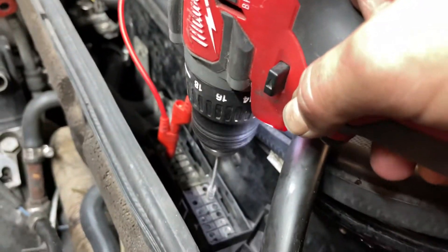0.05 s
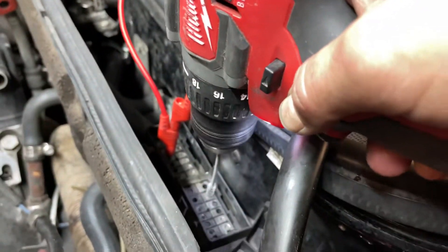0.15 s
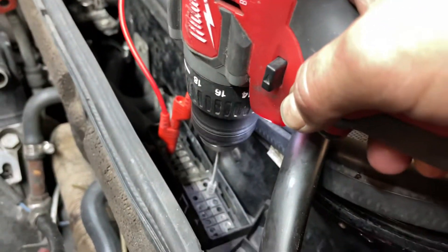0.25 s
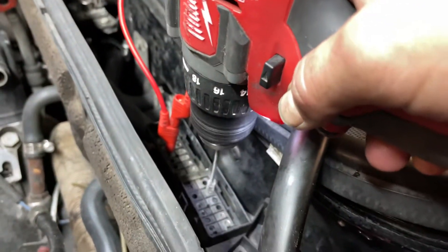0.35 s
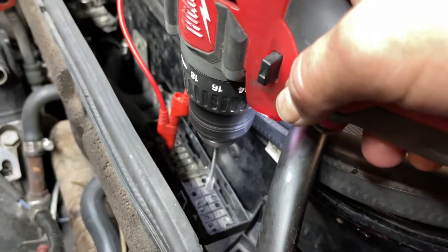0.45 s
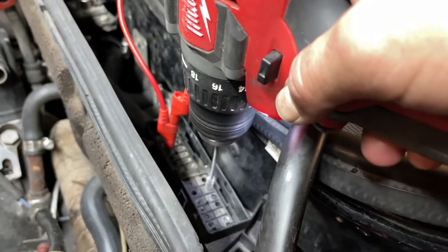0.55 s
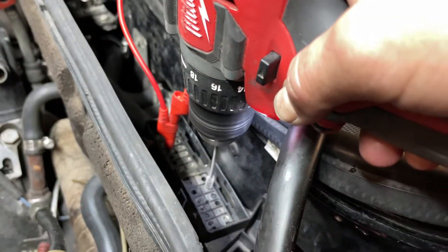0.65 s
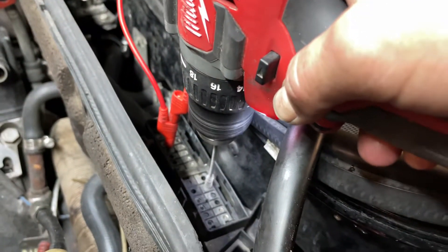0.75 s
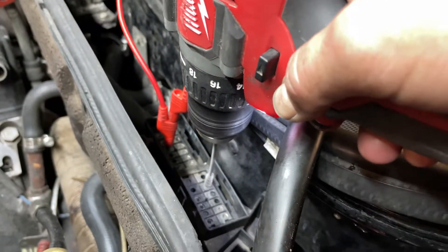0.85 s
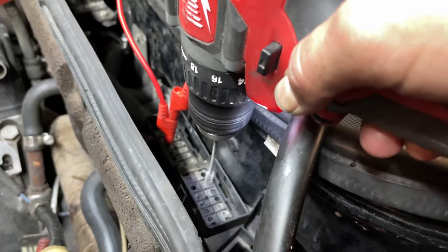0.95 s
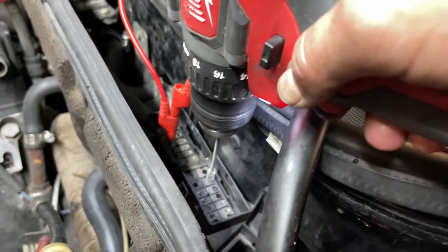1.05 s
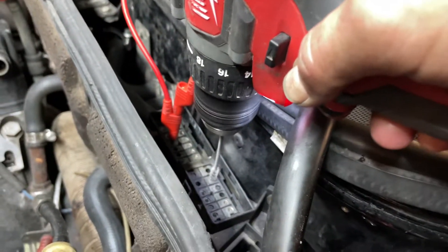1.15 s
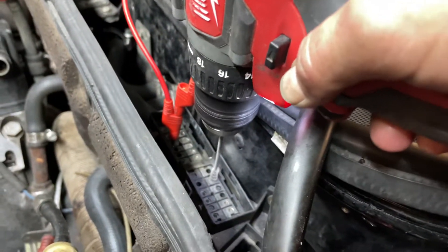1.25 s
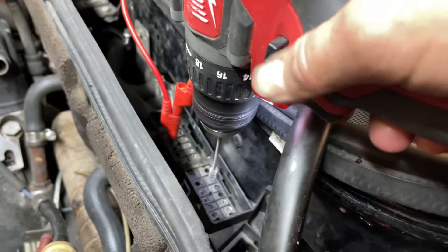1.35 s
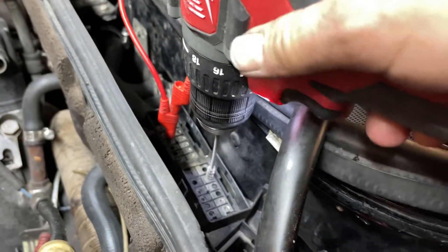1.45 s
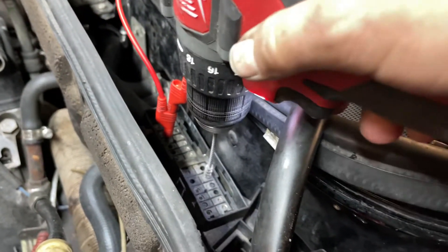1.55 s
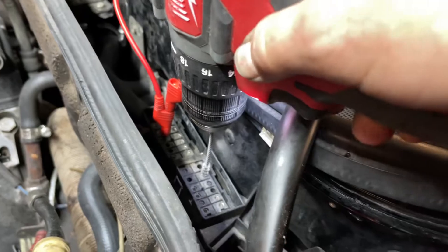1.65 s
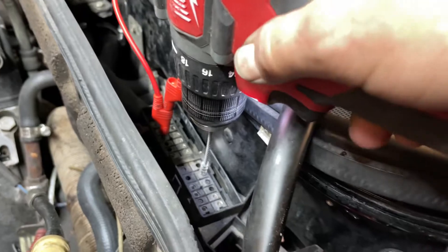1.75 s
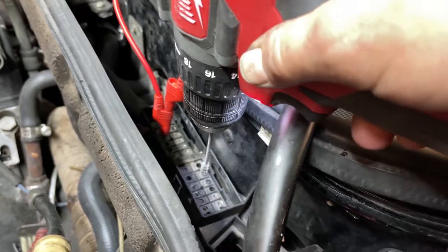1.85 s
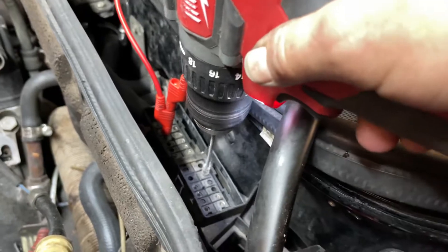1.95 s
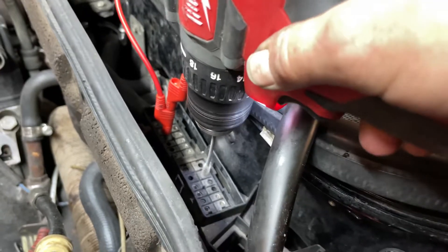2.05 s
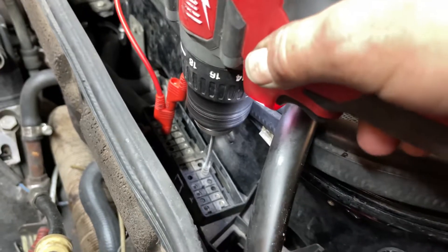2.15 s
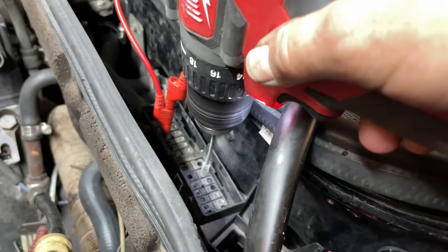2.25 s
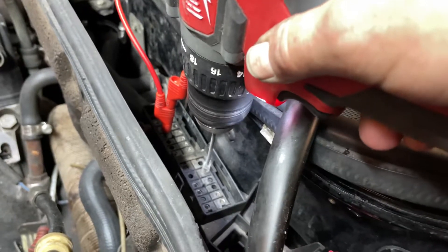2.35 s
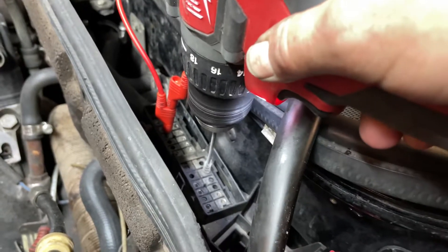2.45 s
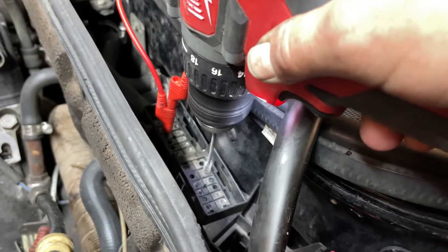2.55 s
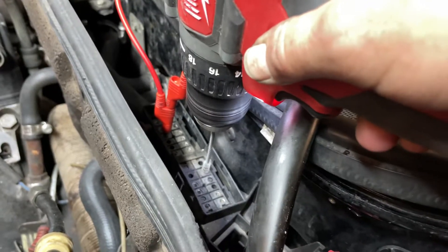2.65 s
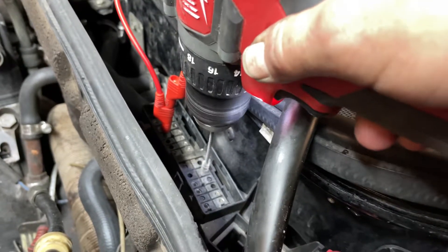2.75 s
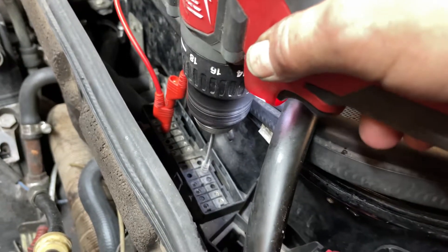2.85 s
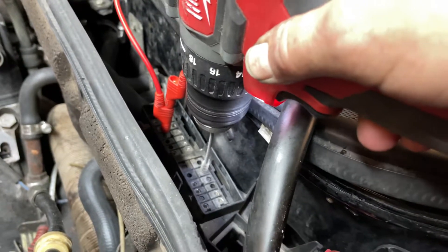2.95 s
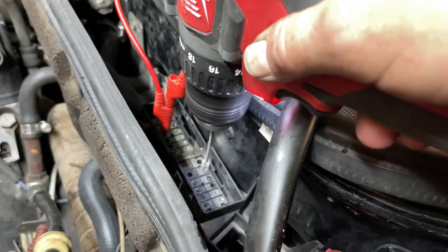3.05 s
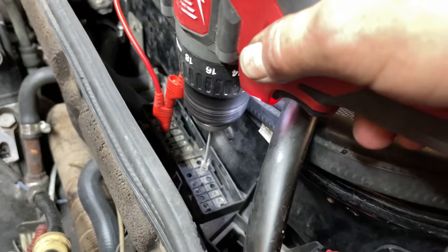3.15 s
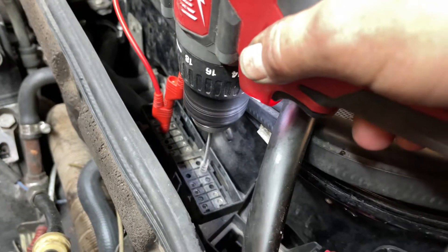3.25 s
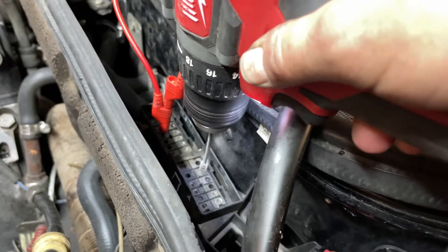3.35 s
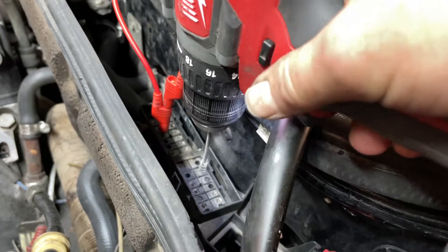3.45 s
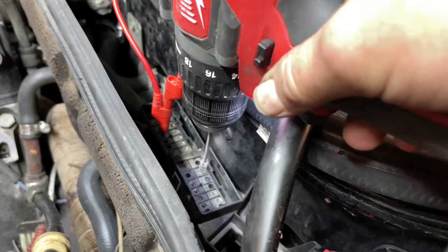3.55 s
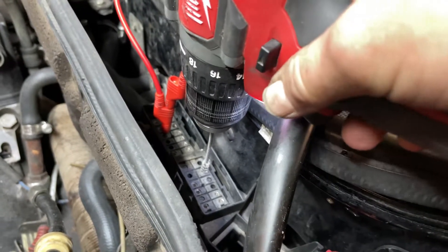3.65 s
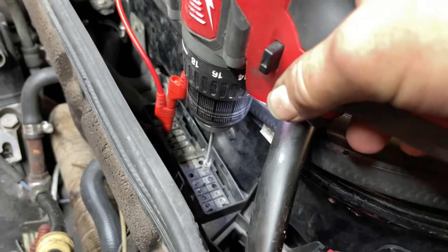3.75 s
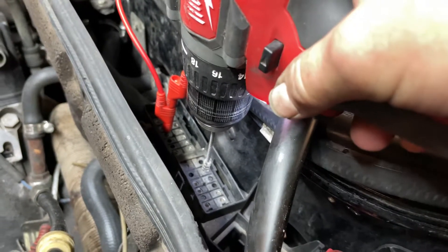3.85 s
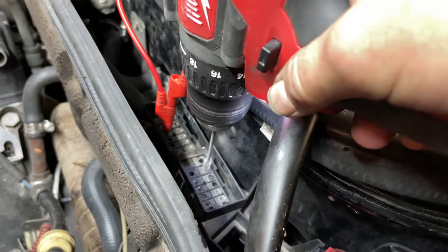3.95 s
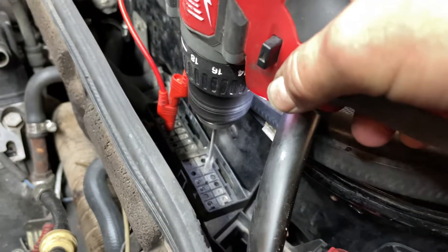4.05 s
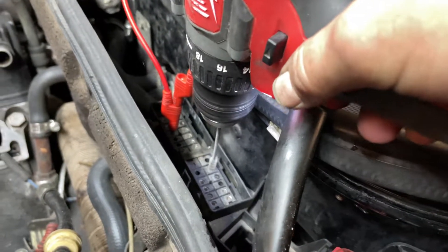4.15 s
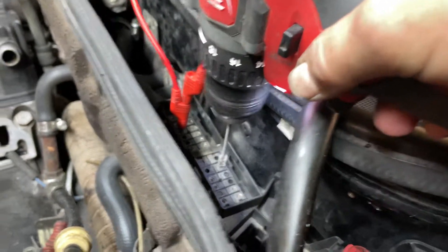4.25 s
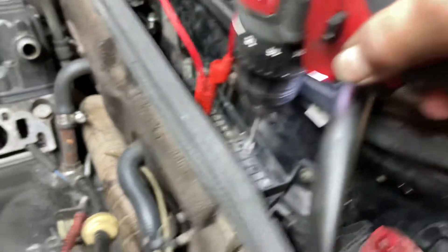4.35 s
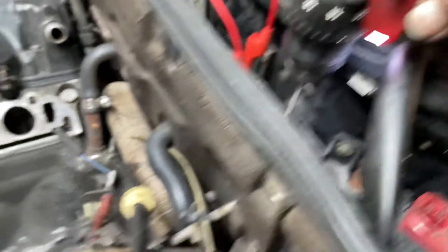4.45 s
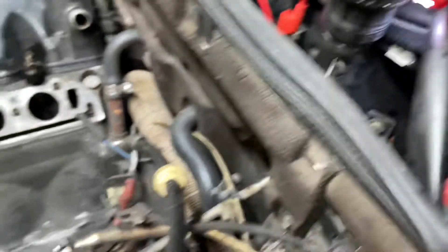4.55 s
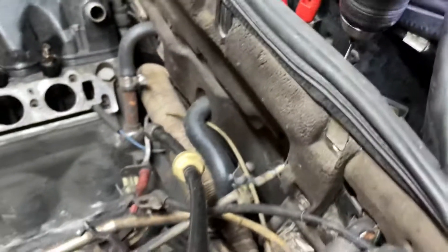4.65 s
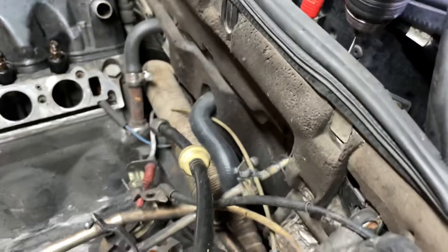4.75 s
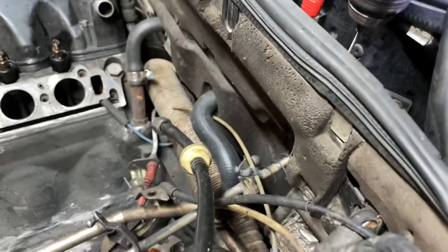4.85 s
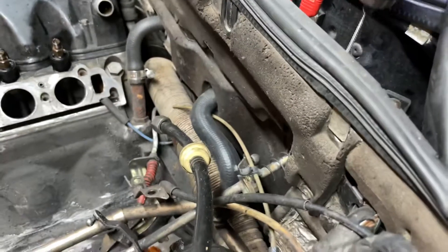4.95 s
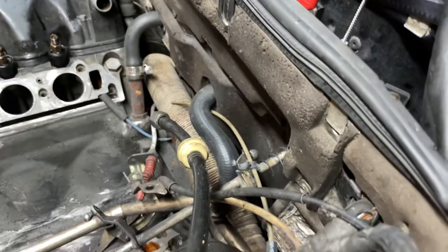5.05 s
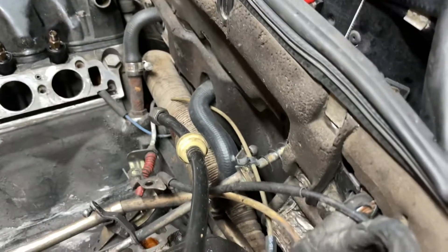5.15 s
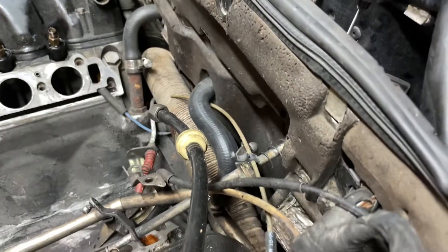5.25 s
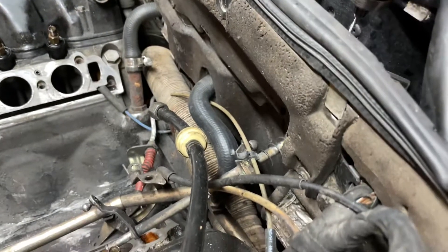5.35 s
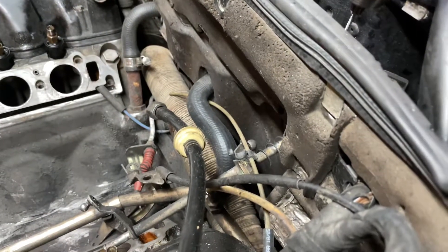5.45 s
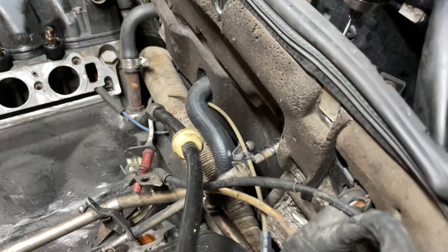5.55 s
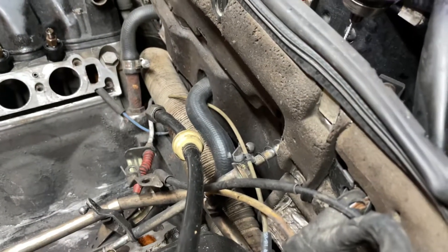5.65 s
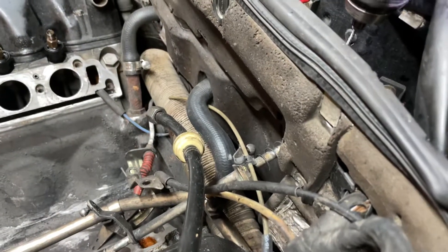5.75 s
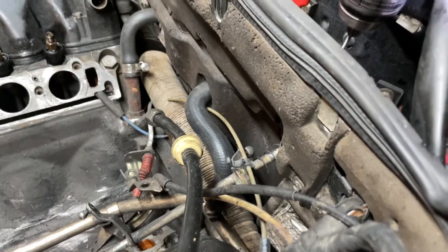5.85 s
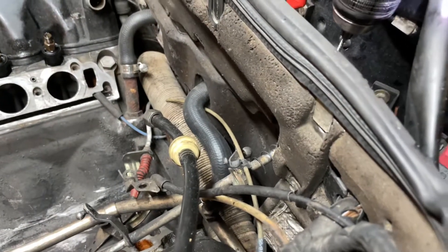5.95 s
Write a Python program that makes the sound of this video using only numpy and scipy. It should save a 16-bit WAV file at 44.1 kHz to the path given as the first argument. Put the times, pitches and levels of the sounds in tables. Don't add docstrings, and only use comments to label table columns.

```python
import sys
import numpy as np
from scipy import signal
from scipy.fft import rfft, irfft, next_fast_len
from scipy.io import wavfile
from scipy.ndimage import uniform_filter1d

SR = 44100
rng = np.random.default_rng(int(sys.argv[2]) if len(sys.argv) > 2 else 0)


def elevation(decibels):
    levels = np.asarray(decibels, float)
    return 10 ** (levels / 20)


def store_wav(level_fs):
    pcm = np.round(np.clip(np.atleast_2d(level_fs), -1, 1) * 32767)
    wavfile.write(sys.argv[1], SR, pcm.T.astype(np.int16))


N = 264776
TIME = np.arange(N) / SR
SIZE = next_fast_len(N + SR)
HZ = np.maximum(np.arange(SIZE // 2 + 1) * SR / SIZE, 1)

# (time [s], rotor speed [rev/s], rattle level [dB])
BURST_POINTS = [
    [(0.05, 116, -22.5), (0.145, 145, -22.5), (0.21, 308, -16), (0.285, 337.5, -16.5),
     (0.855, 339.5, -20.5), (1.0, 291, -24.5), (1.22, 230, -26.5), (1.29, 192, -28.5), (1.345, 169, -30.5)],
    [(1.91, 307, -23.5), (2.0, 335, -22.5), (2.16, 275, -25), (2.3, 242, -25.5), (2.42, 237, -26.5),
     (2.71, 249, -26), (2.86, 243, -26.5), (3.2, 254.5, -26), (3.3, 228, -27.5)],
    [(3.88, 307, -21), (3.93, 334, -19), (4.0, 351.5, -19.5), (4.095, 340, -19), (4.15, 320, -20.5),
     (4.175, 270, -16.5), (4.2, 200, -27)],
    [(4.56, 286, -23), (4.6, 398, -17.5), (4.65, 437, -16), (4.74, 451, -16), (4.79, 450, -21),
     (4.89, 377, -24), (4.92, 318, -21.5), (4.945, 254, -21)],
]
# (trigger pressed [s], trigger released [s], backwards share [0-1], controller nearness [dB])
TRIGGER_PULLS = [
    (-.1, 1.319, 0, 0.1),
    (1.845, 3.275, 0.99, -0.3),
    (3.81, 4.16, 0.0072, -2.5),
    (4.495, 4.858, 0.0097, -7),
]
TONE_ORDERS = [(0, 1), (0, 2), (0, 3), (0, 4), (0, 5), (0, 7.76), (0, 8), (0, 8.34), (0, 9.34), (0, 12),
               (0, 13), (0, 15.12), (0, 16.12), (0, 17.12), (1, -4), (1, 0), (1, 4), (2, -4), (2, -3),
               (2, -2)]
# (forwards [dB], backwards [dB], slope [dB/octave of speed])
TONE_LEVELS = [(-51.5, -47, 22), (-55.5, -56, 1.5), (-53.5, -60, 7), (-49, -57, 2), (-53.5, -56, 9.5),
               (-53.5, -54.5, -3), (-50, -51, 22), (-45, -48.5, -9), (-45.5, -58, -4), (-48.5, -47, -16),
               (-50.5, -50, 5), (-58, -57.5, 1), (-49.5, -48.5, -15), (-53, -56.5, 0), (-45, -33, 0.5),
               (-51, -45.5, 0), (-36.5, -38, 0.5), (-34, -44, -8), (-58, -57.5, 2), (-58.5, -57, 0.5)]
# (centre [Hz], width [Hz], gain [dB])
CASING_MODES = [(663, 70, 8.5), (1022, 90, 9), (2130, 240, 11), (2608, 160, 9), (2935, 210, 15),
                (3167, 68, 16.5), (3525, 260, 18), (3990, 120, 7.5), (4557, 430, 8.5), (5430, 170, 16),
                (5851, 200, 9.5)]
# (frequency [Hz], density [dB/Hz])
HOUSING_COLOUR = [(150, -7), (300, -9), (600, -2), (900, -1.5), (1250, 5), (1700, 2), (2500, 7.5),
                  (3300, 4.5), (4300, -1.5), (5800, 1.5), (7500, -7), (10000, -14), (13000, -19),
                  (15500, -18)]
# (frequency [Hz], likeness [0-1])
RATTLE_LIKENESS = [(100, 1), (300, 0.8), (700, 0.41), (1200, 0.71), (2000, 0.81), (3000, 0.093),
                   (4000, 0.26), (5500, 0.1), (7000, 0.73), (9000, 0.99), (14000, 1)]
# (frequency [Hz], density [dB])
SHOP_COLOUR = [(18, -38), (30, -9), (146, 0.5), (301, -16.5), (485, -13), (800, -29), (2080, -33),
               (2540, -28), (2800, -32.5), (9000, -69), (15600, -100), (22000, -120)]
# (band centre [Hz], T60 [s])
SHOP_DECAY = [(300, .7), (2000, 0.83), (5000, 0.56), (12000, 0.18)]
# (time [s], peak [dB], main ring [Hz], relative treble [dB], T60 [s])
SWITCH_CLICKS = [(1.37, -19.5, 1840, -21, 0.026), (1.429, -37.5, 1942, -47, 0.03),
                 (1.512, -5, 3190, -29, 0.018), (1.691, -50.5, 996, -20.5, 0.03),
                 (1.741, -47, 1940, -34, 0.03), (1.778, -48.5, 981, -25, 0.03),
                 (1.87, -11, 3620, -20.5, 0.033), (3.335, -33.5, 2080, -25, 0.03),
                 (3.374, -42.5, 2980, -16, 0.03), (3.421, -54, 1950, -30, 0.03),
                 (3.493, -15, 1910, -9, 0.03), (3.525, -13.5, 1890, -25, 0.03),
                 (3.684, -40, 2041, -19.5, 0.03), (3.703, -37.5, 2622, -20, 0.023),
                 (3.715, -47, 2650, -22, 0.034), (3.758, -45.5, 1290, -28, 0.027),
                 (3.834, -7.5, 1590, -20, 0.039), (4.214, -28.5, 2590, -20.5, 0.03),
                 (4.283, -26.5, 2727, -17.5, 0.036), (4.368, -47.5, 2610, -35, 0.027),
                 (4.416, -47, 2713, -9, 0.027), (5.471, -47, 1510, -49, 0.03),
                 (5.627, -35, 1420, -28.5, 0.053), (5.745, -47, 1270, -15.5, 0.03)]
# (time [s], peak [dB], pitch [Hz])
HAND_THUMPS = [
    (1.399, -40.5, 191),
    (3.655, -48.5, 207),
    (5.298, -40.5, 180),
    (5.378, -46, 196),
    (5.48, -43, 267),
    (5.609, -42.5, 163.7),
    (5.639, -40.5, 196),
    (5.8, -43.5, 202),
]
# (time [s], spread [s], level [dB])
SKIN_RUBS = [
    (5.79, 0.028, -58.5),
    (5.93, .04, -63.5),
    (3.76, 0.033, -63.5),
    (4.47, .03, -61.5),
    (1.82, .03, -65.5),
]
# (time [s], level [dB])
GRIP_RUSTLE = [
    [(3.56, -63), (3.644, -75), (3.8, -84)],
    [(5.2, -73), (5.486, -63.5), (6.0, -69)],
]
# (frequency [Hz], left lead [rad])
PORT_LEAD = [(0, 0.5), (780, -0.68), (1030, 0.5), (1550, 0.5), (2580, 0.33), (2930, 0.37), (3450, 3.5),
             (4050, 0.58), (5250, 0.2), (7920, 3), (13600, 3.5), (13900, 4), (15800, 5), (16500, 3.5)]
# (frequency [Hz], left minus right [dB])
PORT_LEVEL = [(60, 0.5), (180, 0.5), (550, 1), (1650, -1.5), (4970, -1), (15000, -4)]

CHOPPER_HZ, FULL_SPEED_REV_S, CRAWL_REV_S = 7623, 375, 185
STILL_DB, INERTIA_S = -50.5, 0.03
START_S, START_REV_S, START_REL_DB = 0.021, 88, -3
STOP_S, STOP_REV_S = 0.04, 45


def rms_one(x):
    return x / np.sqrt(np.mean(x ** 2) + 1e-20)


def at_hz(points):
    hz, value = np.transpose(points)
    return np.interp(np.log(HZ), np.log(np.maximum(hz, 1)), value)


def shaped(x, response):
    return irfft(rfft(x, SIZE) * response, SIZE)[..., :N]


def drift(rate_hz):
    pole = np.exp(-80 * np.pi * rate_hz / SR)
    noise = rng.standard_normal(N // 40 + 2002)
    slow = signal.lfilter([1], [1, -2 * pole, pole * pole], noise)[2000:]
    return np.interp(np.arange(N) / 40, np.arange(len(slow)), rms_one(slow))


def ring(x, hz, t60_s):
    radius, step = elevation(-60 / (t60_s * SR)), 2 * np.pi * hz / SR
    poles = [1, -2 * radius * np.cos(step), radius * radius]
    return signal.lfilter([0, np.sin(step)], poles, x + 1e-18)


def controls():
    rows, gate, held = [], 0, 0
    for burst, (pressed, released, _, _) in zip(BURST_POINTS, TRIGGER_PULLS):
        end = burst[-1][0] + STOP_S
        rows += [(pressed, 5, STILL_DB), (pressed + START_S, START_REV_S, burst[0][2] + START_REL_DB)]
        rows += [*burst, (end, STOP_REV_S, STILL_DB)]
        gate = gate + np.interp(TIME, [pressed - 0.004, pressed, end, end + 0.01], [0, 1, 1, 0])
        held = held + np.interp(TIME, [pressed - 0.004, pressed, released, released + 0.023], [0, 1, 1, 0])
    s, speed, rattle_db = np.transpose(rows)
    speed = uniform_filter1d(np.interp(TIME, s, speed), size=int(INERTIA_S * SR))
    current = np.searchsorted([row[0] - 0.01 for row in TRIGGER_PULLS[1:]], TIME)
    _, _, backwards, near_db = np.transpose(TRIGGER_PULLS)[:, current]
    return speed, np.interp(TIME, s, rattle_db), gate, held, backwards, near_db


def tone_levels(speed, rattle_db, held, backwards, near_db):
    coarse, levels = slice(None, None, 32), []
    octaves = np.log2(np.clip(speed, CRAWL_REV_S, None) / 300)
    for (chop, order), (ahead_db, back_db, slope_db) in zip(TONE_ORDERS, TONE_LEVELS):
        hz = chop * CHOPPER_HZ + order * speed[coarse]
        swell = 1
        for mode_hz, width_hz, gain_db in CASING_MODES:
            swell = swell + elevation(gain_db) ** 2 / (1 + (2 * (hz - mode_hz) / width_hz) ** 4)
        swell = swell / (1 + (order > 6) * (1520 / hz) ** 8)
        level_db = ahead_db + (back_db - ahead_db) * backwards + slope_db * octaves
        level_db = level_db + 0.59 * (rattle_db + 23)
        level_db = level_db + np.interp(TIME, TIME[coarse], 10 * np.log10(swell))
        if chop:
            level_db = level_db + near_db - 40 * (1 - held)
        else:
            brake_db = np.interp(speed, [CRAWL_REV_S, CRAWL_REV_S + 50], [-7, 9 if order == 4 else -3.5])
            level_db = level_db + brake_db * (1 - held)
        levels.append(level_db)
    return levels


def tones(turns, speed, levels_db):
    out = np.zeros((2, N))
    chopping = np.clip((FULL_SPEED_REV_S - speed) / 20, 0, 1) * elevation([[3.5], [-3.5]])
    for (chop, order), level_db in zip(TONE_ORDERS, levels_db):
        angle = 2 * np.pi * (chop * CHOPPER_HZ * TIME + order * turns + rng.random())
        on = chopping if chop else 1
        flutter_db = 2.0 * (chop == 0) * drift(29)
        out += on * elevation(level_db + flutter_db) * np.sqrt(2) * np.sin(angle)
    return out


def rattle(turns, speed, level_db):
    sizes = elevation(np.minimum(rng.exponential(1, (2, N)), 4)) * rng.standard_normal((2, N))
    struck = rng.random((2, N)) < np.clip(speed * 40 / SR, 0.02, 1)
    beats = 1 + 0.18 * np.cos(2 * np.pi * turns) + 0.12 * np.cos(2 * np.pi * turns / 3.8)
    hits = sizes * struck * beats / np.sqrt(np.clip(speed, 25, None))
    alike = np.clip(at_hz(RATTLE_LIKENESS), 0, 1)
    one, other = rfft(hits, SIZE) * elevation(at_hz(HOUSING_COLOUR))
    pair = np.array([one, alike * one + np.sqrt(1 - alike ** 2) * other])
    bass, treble = 1 / (1 + (HZ / 900) ** 4), 1 / (1 + (6800 / HZ) ** 8)
    low, middle, high = (irfft(pair * part, SIZE)[:, :N] for part in (bass, 1 - bass - treble, treble))
    treble_db = 1 - 2.5 * np.log2(np.clip(speed, 60, None) / 300)
    mix = low * elevation(2.0 * drift(5.4)) + middle * elevation(1.2 * drift(18))
    mix = mix + high * elevation(treble_db + 2.1 * drift(13))
    return elevation(level_db) * mix / np.std(low + middle)


def drill():
    speed, rattle_db, gate, held, backwards, near_db = controls()
    turns = np.cumsum(speed * (1 + 0.0012 * drift(26))) / SR
    sung = tones(turns, speed, tone_levels(speed, rattle_db, held, backwards, near_db))
    noise = rattle(turns, speed, rattle_db - 2.5)
    passband = np.clip((15900 - HZ) / 250, 0, 1) / (1 + (110 / HZ) ** 4)
    return shaped(gate * (elevation(1.5) * sung + noise), passband)


def shop_floor():
    mid, side = shaped(rng.standard_normal((2, N)), elevation(at_hz(SHOP_COLOUR)))
    side = shaped(side, 0.08 + 0.6 * HZ / (HZ + 400))
    hiss = elevation(-58 + 1.1 * drift(5.8)) * rms_one(mid + side * [[1], [-1]])
    hum = elevation(-63 + 3.0 * drift(4)) * np.sin(2 * np.pi * 120 * TIME)
    return hiss + hum


def shop_echo(x, wet_db):
    span, tail = np.arange(SR) / SR, 0
    noises = rng.standard_normal((len(SHOP_DECAY), 3, SR))
    for (hz, t60_s), (shared, left, right) in zip(SHOP_DECAY, noises):
        band = signal.butter(2, [hz / 2.1, min(hz * 1.8, 20000)], "band", fs=SR, output="sos")
        noise = 0.8 * shared + np.array([left, right])
        tail = tail + signal.sosfilt(band, noise) * elevation(-60 * span / t60_s)
    tail = tail * np.minimum(span / 0.018, 1)
    return elevation(wet_db) * shaped(x, rfft(tail / np.sqrt(np.sum(tail ** 2) / 2), SIZE))


def clicks():
    span = np.arange(4410) / SR
    out = np.zeros(N + len(span))
    noises = rng.standard_normal((len(SWITCH_CLICKS), 2, len(span)))
    bright = signal.butter(2, 4800, "high", fs=SR, output="sos")
    for (s, peak_db, hz, treble_db, t60_s), (grain, uneven) in zip(SWITCH_CLICKS, noises):
        envelope = np.minimum(span / 0.0032, 1) ** 2 * elevation(-60 * span / np.clip(t60_s, 0.008, 0.2))
        snaps = grain * np.exp(1.2 * uneven) * envelope
        around = signal.butter(1, [hz / 2.5, hz * 2.3], "band", fs=SR, output="sos")
        knock = rms_one(signal.sosfilt(around, snaps))
        crack = rms_one(signal.sosfilt(bright, snaps ** 2 * np.sign(uneven)))
        sound = 0.29 * rms_one(ring(snaps, hz, 0.036)) + knock + elevation(treble_db) * crack
        start = round((s - 0.002) * SR)
        early_rms = np.sqrt(np.mean(sound[40:260] ** 2))
        out[start:start + len(span)] += elevation(peak_db - 11) * sound / early_rms
    return out[:N]


def hand():
    out = np.zeros(N)
    for s, peak_db, hz in HAND_THUMPS:
        push = np.exp(-((TIME - s - 0.004) / 0.001) ** 2)
        out += 1.7 * elevation(peak_db) * ring(push / push.sum(), hz, 0.13)
    strokes = sum(elevation(db) * np.exp(-((TIME - s) / spread_s) ** 2) for s, spread_s, db in SKIN_RUBS)
    grain = rng.standard_normal((2, N)) * elevation(4.0 * drift(90))
    rub = rms_one(shaped(grain[0], HZ / (HZ + 600) / (1 + (HZ / 3000) ** 2)))
    rustle = sum(elevation(np.interp(TIME, *np.transpose(rows), left=-120, right=-120)) for rows in GRIP_RUSTLE)
    dull = rms_one(shaped(grain[1], 1 / (1 + (170 / HZ) ** 3) / (1 + (HZ / 450) ** 2)))
    return out + strokes * rub + rustle * dull


def scene():
    near = drill() + clicks() + hand()
    return near + shop_echo(near[0], wet_db=-32) + shop_floor()


def roll_off(x):
    return signal.sosfilt(signal.butter(12, 16930, fs=SR, output="sos"), x)


def record(dry):
    half = elevation(at_hz(PORT_LEVEL) / 2) * np.exp(0.5j * at_hz(PORT_LEAD))
    top = np.clip((16900 - HZ) / 400, 0, 1)
    mix = shaped(dry, top * np.array([half, 1 / half]))
    return roll_off(mix)


dry = scene()
out = record(dry)
store_wav(out)
```